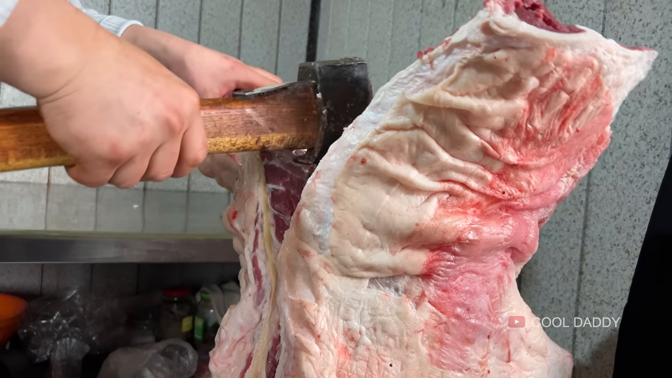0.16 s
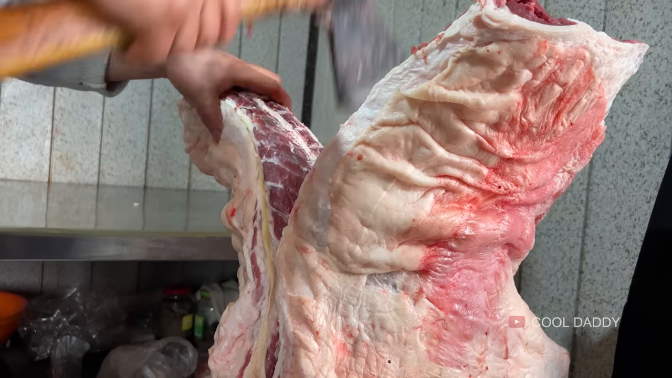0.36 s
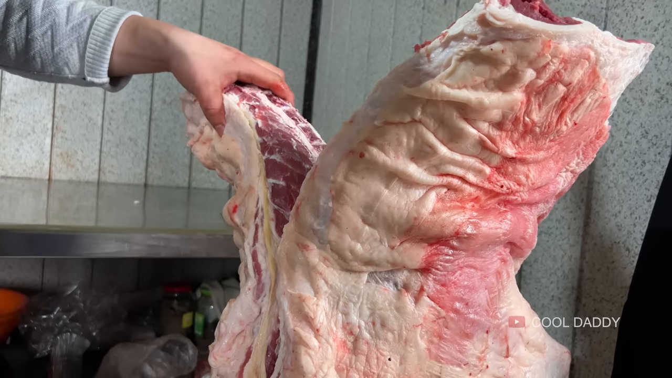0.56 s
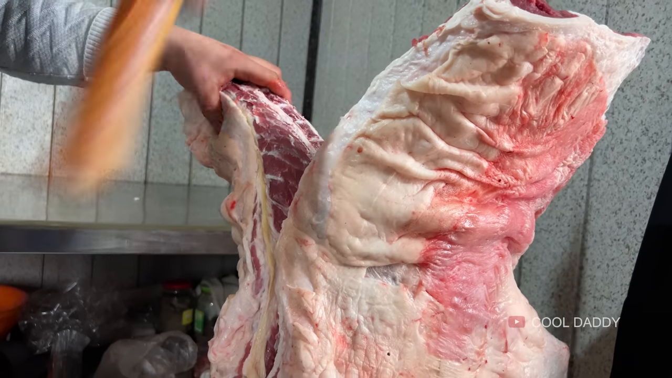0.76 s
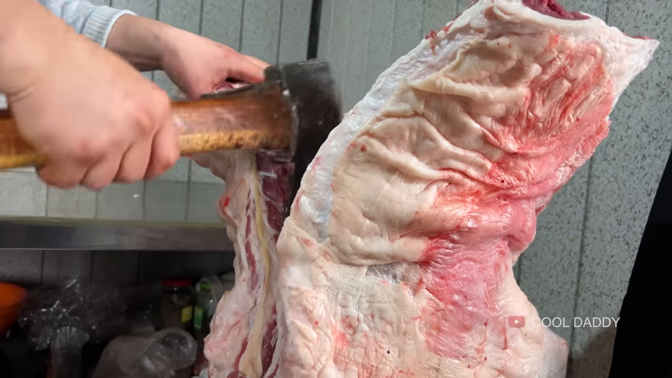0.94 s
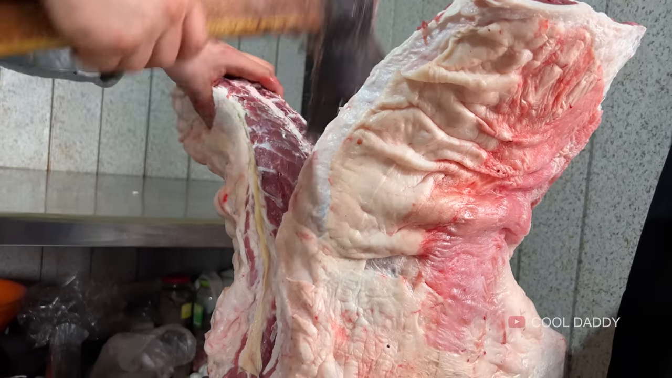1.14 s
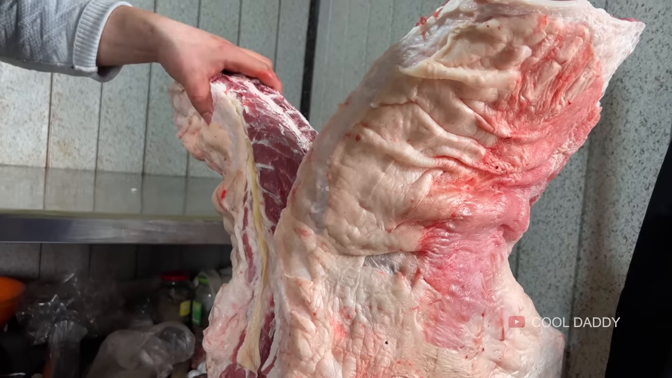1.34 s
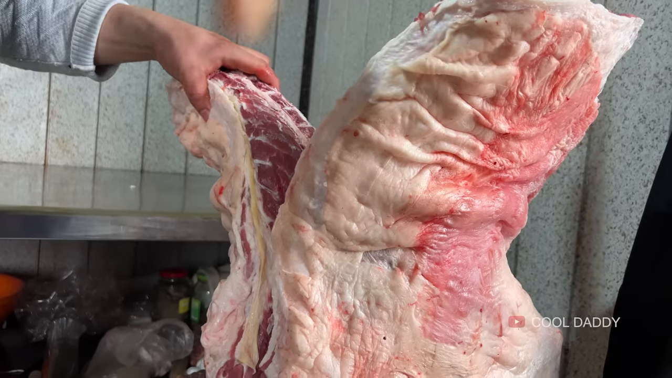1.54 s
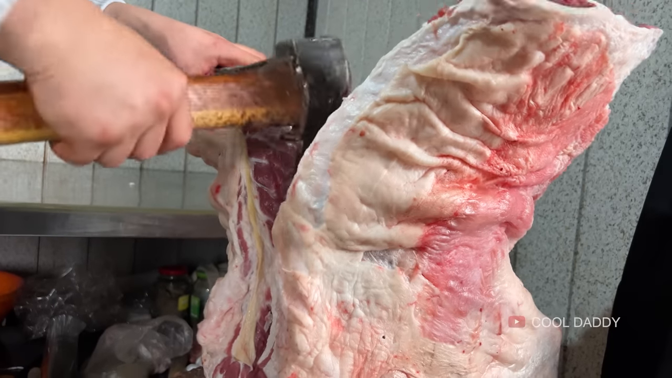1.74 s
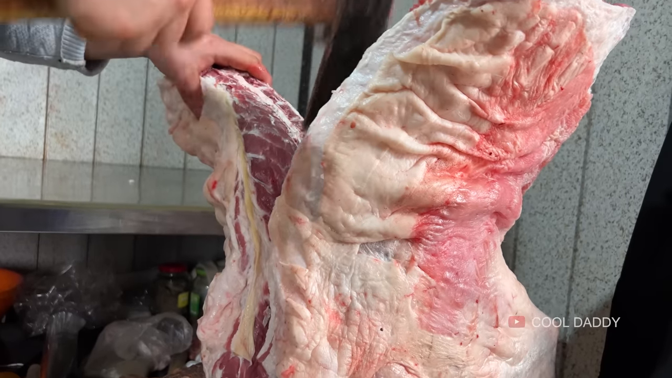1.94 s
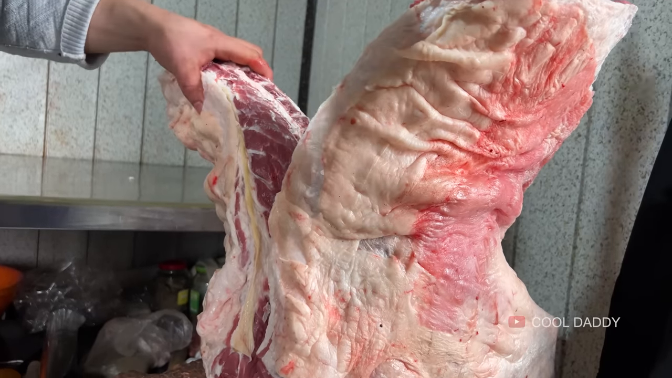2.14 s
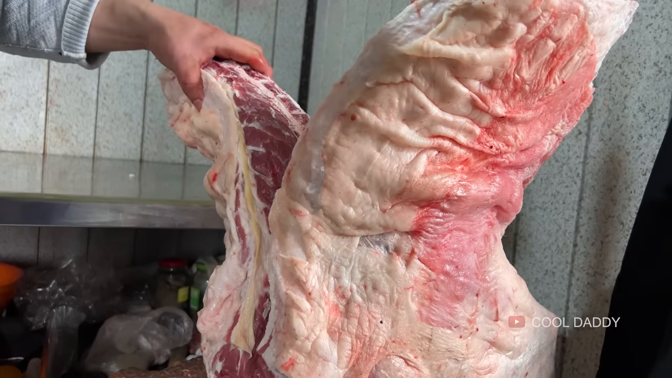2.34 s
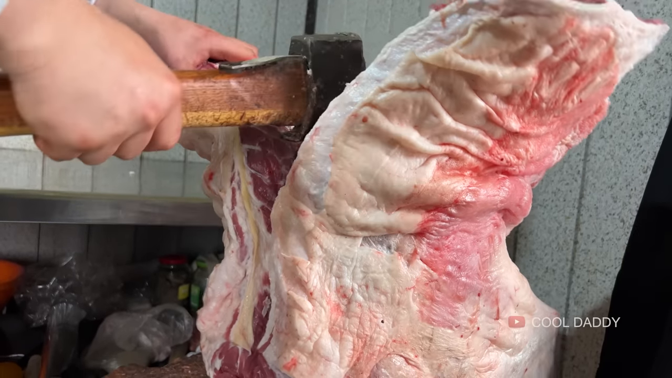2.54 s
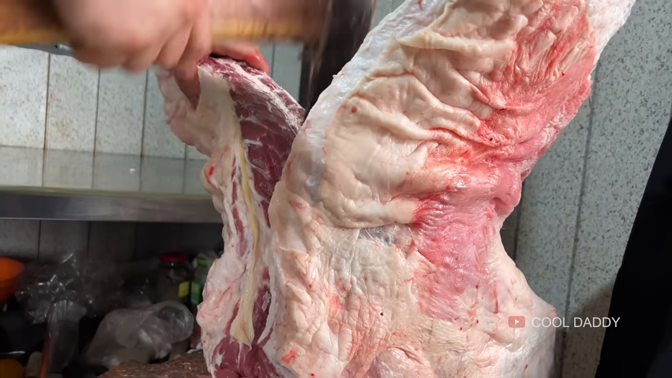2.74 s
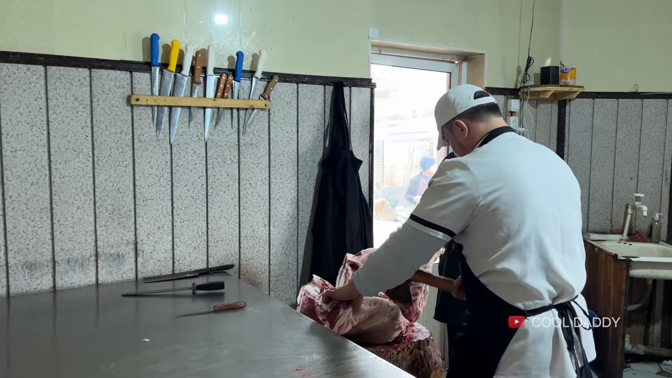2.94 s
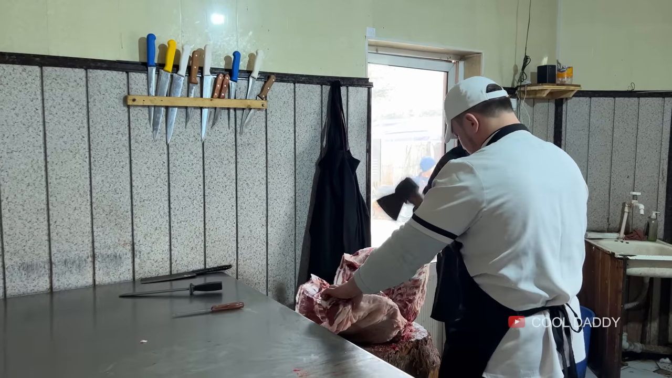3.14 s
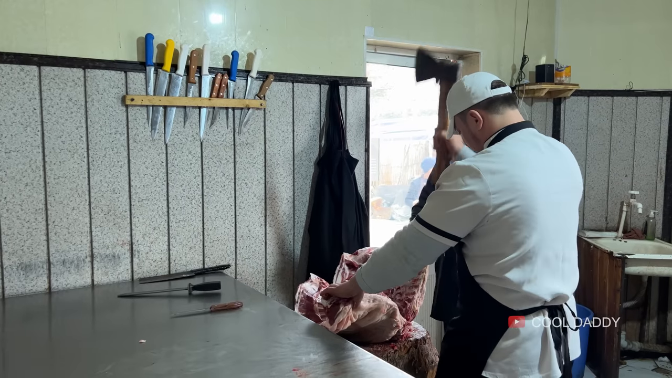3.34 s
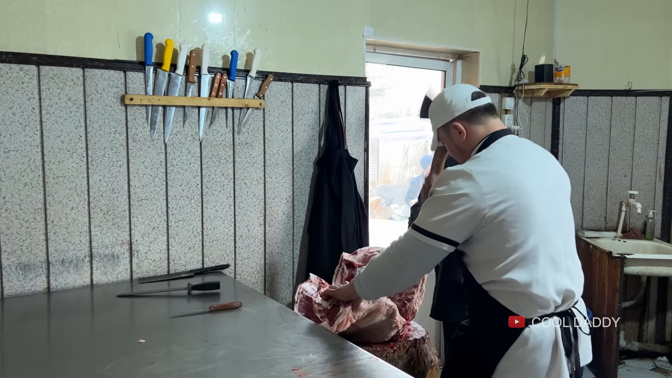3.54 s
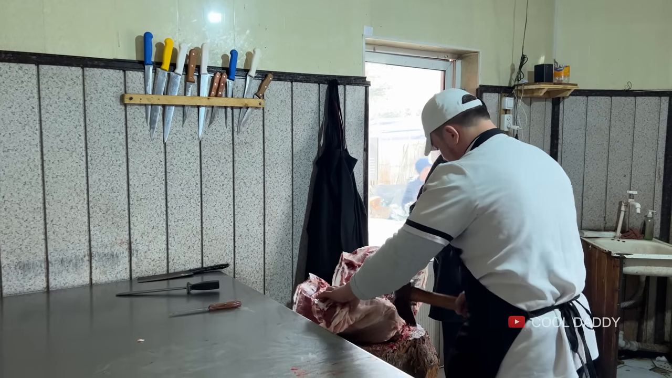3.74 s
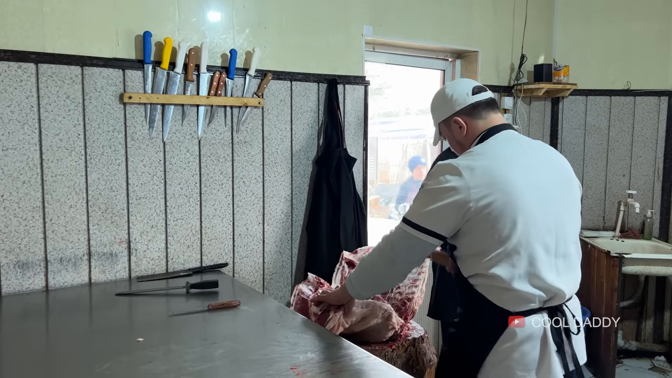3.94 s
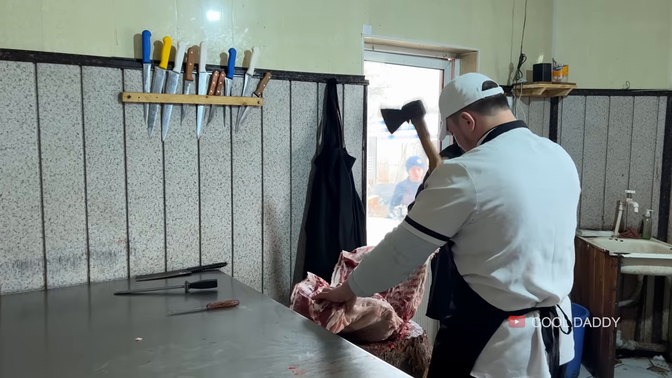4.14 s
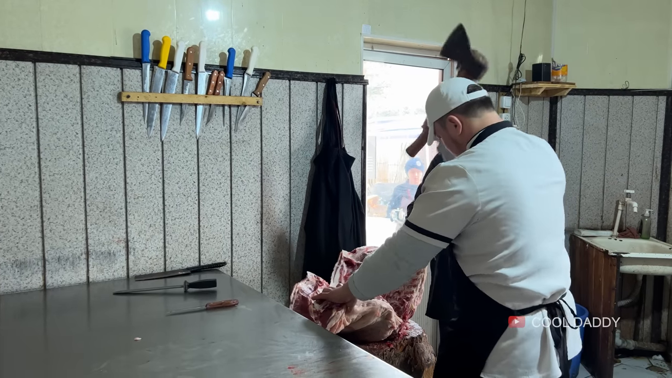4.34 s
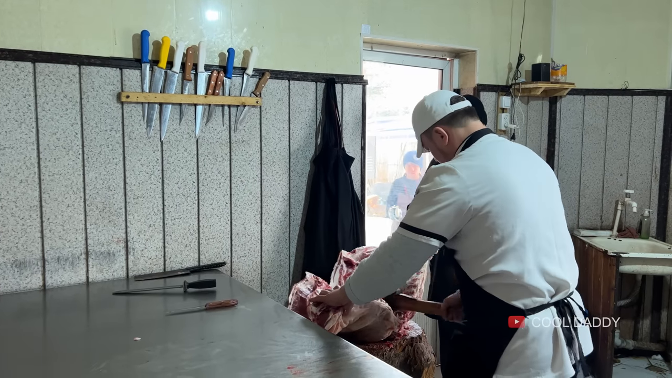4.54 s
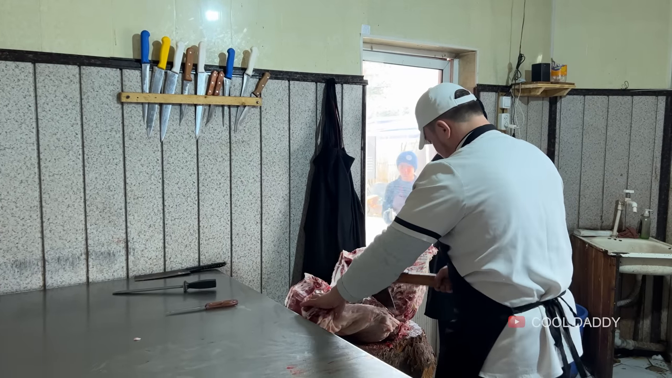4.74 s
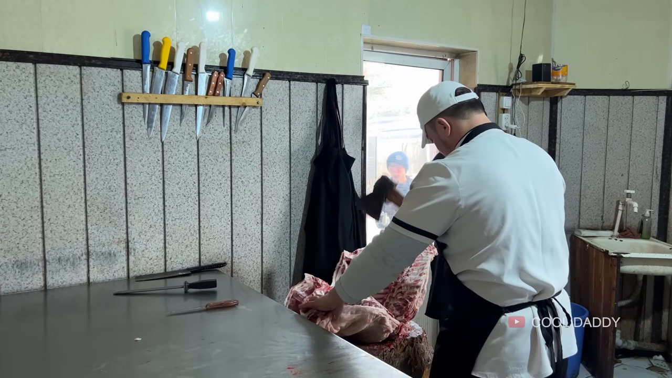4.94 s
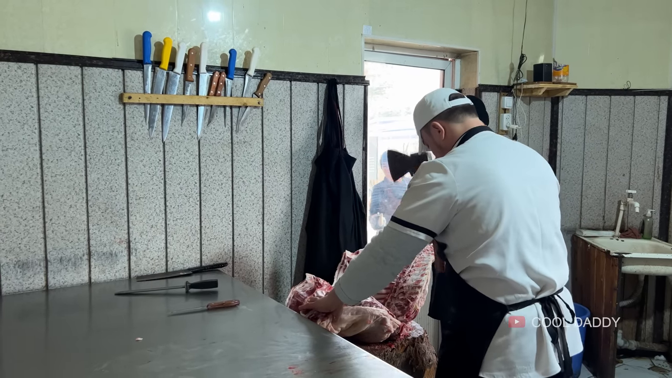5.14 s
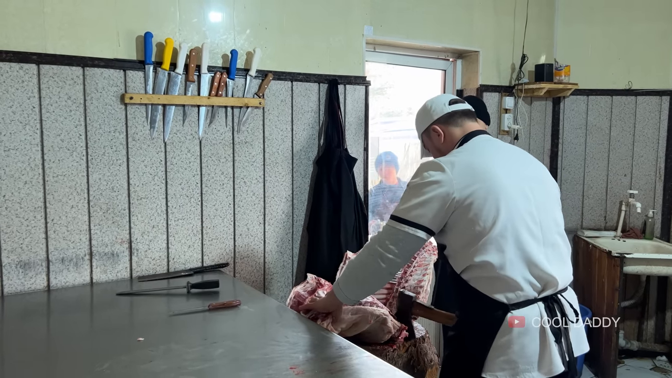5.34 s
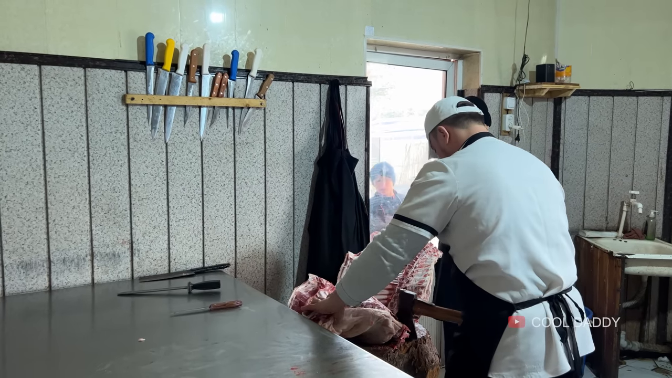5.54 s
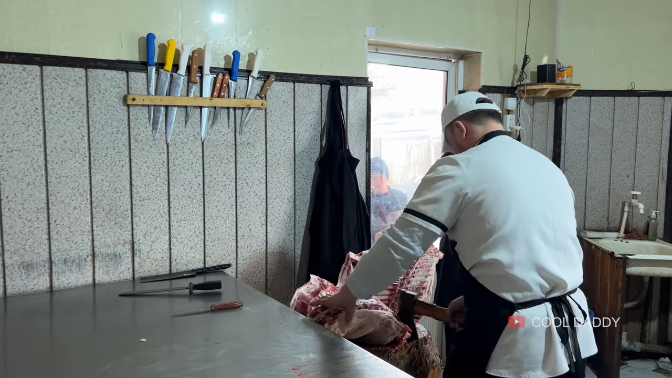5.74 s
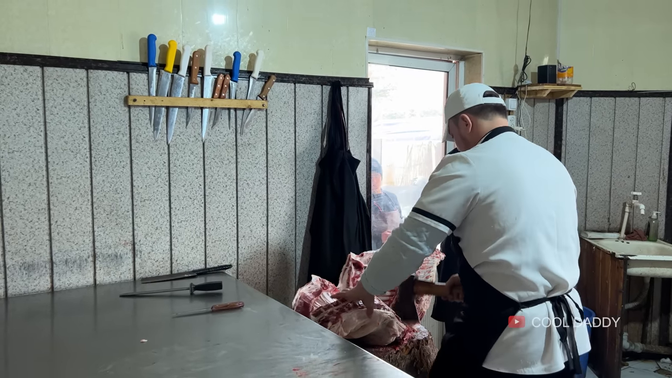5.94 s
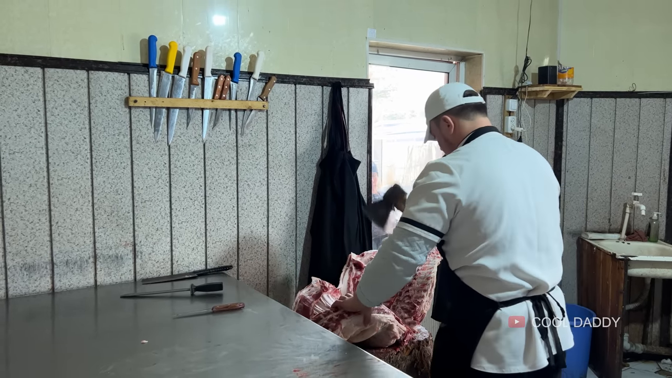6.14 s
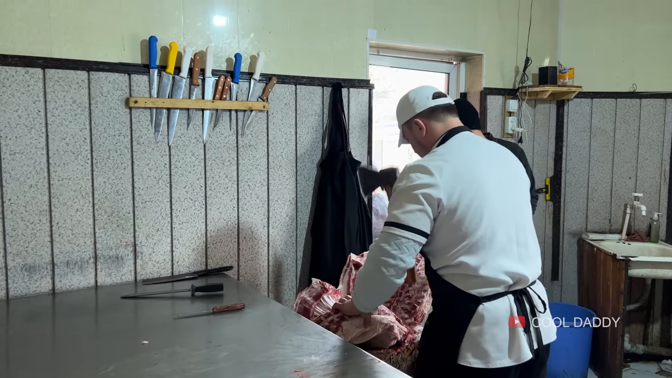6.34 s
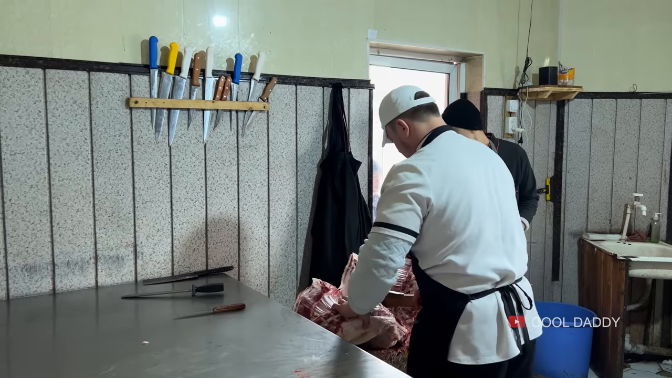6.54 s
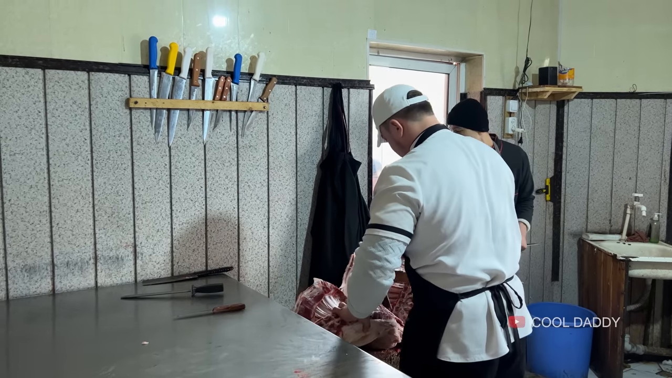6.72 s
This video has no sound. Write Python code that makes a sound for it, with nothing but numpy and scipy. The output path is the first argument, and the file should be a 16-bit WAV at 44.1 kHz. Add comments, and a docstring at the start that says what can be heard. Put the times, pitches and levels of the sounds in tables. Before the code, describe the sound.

Sharp bony whacks with splintering cracks and dull wooden thuds, close and dry at first, then more echoing, with a faint hinge squeak.

```python
"""A heavy axe splits a carcass on a wooden block in a tiled room, heard first from close by, then from across the room.
In most blows the edge knocks on bone (short ringing tones) and crushes into it, the bone splinters (bursts of tiny
cracks), and a moment later meat and block thud (filtered grains and ringing wood). At 0 and 2.87 s only the end of
a blow is heard, tearing bone and thud. In between come fine crackles, thin hisses and a faint hinge squeak (a
wavering tone and noise). A cooler hums in dull room air (filtered noise); wall echoes and a tail make the room."""
import sys
import numpy as np
from scipy import signal
from scipy.fft import rfft, irfft, next_fast_len
from scipy.io import wavfile
from scipy.ndimage import uniform_filter1d, minimum_filter1d

SR = 44100
rng = np.random.default_rng(int(sys.argv[2]) if len(sys.argv) > 2 else 0)


def generate_wav(sig):
    """Save sig (samples, or channels by samples) to the path in sys.argv[1] as 16-bit PCM at SR."""
    pcm = np.round(np.clip(np.atleast_2d(sig).T, -1, 1) * 32767).astype(np.int16)
    wavfile.write(sys.argv[1], SR, pcm)


N = 298998  # length of the whole sound in samples
EVENT_SIZE = 2 ** 14  # length of one short sound in samples
TIME = np.arange(N) / SR

# The edge meets bone. Each row: start in seconds, level in dB, ring pitch in Hz,
# time for the ring to fall by 60 dB in seconds.
EDGE_HITS = [(.8078, -17, 1650, .014), (1.6413, -27, 2600, .01), (2.4456, -15, 2150, .012),
             (3.6432, -18, 1500, .008), (4.5132, -16, 1700, .008), (5.3068, -20, 1500, .008),
             (6.479, -36, 1100, .012)]
# Tone colour of breaking bone. Each row: frequency in Hz, level in dB per Hz.
BONE_COLOUR = [(60, -40.5), (200, -15.5), (400, -4), (700, -8.5), (1100, -1), (1800, 0.5), (3000, -3),
               (5000, -7.5), (8000, -17), (12000, -22), (16000, -28.5)]


def from_db(db):
    """Turns decibels into a plain amplitude factor."""
    return np.exp(np.asarray(db) * (np.log(10) / 20))


def rms_one(x):
    """Scales a sound to an rms (average strength) of 1."""
    return x / np.sqrt(np.mean(x ** 2) + 1e-20)


def unit_blow(x):
    """Scales a sound to the energy of 10 ms at rms 1, so that short and long blows compare."""
    return x * np.sqrt(.01 * SR / (np.sum(x ** 2) + 1e-20))


def at_hz(points, hz):
    """Reads a table between its rows, on a logarithmic frequency axis."""
    known_hz, values = np.transpose(points)
    return np.interp(np.log(np.maximum(hz, 1)), np.log(known_hz), values)


def bins(size):
    """Frequencies in Hz of the spectrum of a sound with this many samples."""
    return np.arange(size // 2 + 1) * SR / size


def bell(hz, centre_hz, width_hz):
    """Shape of a resonance: 1 on top, one half at half the width to either side."""
    return 1 / (1 + (2 * (hz - centre_hz) / width_hz) ** 2)


def coloured(x, curve_db):
    """Filters with a given gain at each frequency; minimum phase, so nothing sounds ahead of its cause."""
    cepstrum = irfft(np.log(from_db(curve_db)))
    half = len(cepstrum) // 2
    # folding the cepstrum onto positive times gives the minimum phase
    folded = np.r_[cepstrum[0], 2 * cepstrum[1:half], np.zeros(half)]
    return irfft(rfft(x) * np.exp(rfft(folded)))


def steady_noise(gain):
    """Noise of rms 1, shaped by a function that gives the gain at each frequency."""
    size = next_fast_len(N, real=True)
    spectrum = rfft(rng.standard_normal(size)) * gain(bins(size))
    return rms_one(irfft(spectrum, size)[:N])


def add(track, s, sound):
    """Mixes a sound into a track, starting at s seconds."""
    start = max(round(s * SR), 0)
    track[start:start + len(sound)] += sound[:N - start]


def ring(hz, t60, size=EVENT_SIZE):
    """One struck tone that falls by 60 dB in t60 seconds."""
    t = TIME[:size]
    return np.sin(2 * np.pi * hz * t) * from_db(-60 * t / t60)


def grains(length_s, per_s, spread_db):
    """A run of tiny ruptures of uneven size that starts at once and dies away around its length."""
    t = TIME[:EVENT_SIZE]
    born = rng.random(EVENT_SIZE) < per_s / SR
    signs = rng.choice([-1, 1], EVENT_SIZE)
    extra_db = spread_db * np.minimum(rng.exponential(1, EVENT_SIZE), 3)
    return born * signs * from_db(extra_db) * np.exp(-(t / length_s) ** 4)


def knocks(second_ratio=1.4, second_db=-3.0):
    """The edge sets the bone ringing in two tones for a few cycles, smothered by the meat round it."""
    out = np.zeros(N)
    for s, level_db, hz, t60 in EDGE_HITS:
        first_tone = ring(hz, t60)
        second_tone = from_db(second_db) * ring(hz * second_ratio, t60)
        add(out, s, from_db(level_db) * unit_blow(first_tone - second_tone))
    return out


def bites(bite_db=-10.0, bite_s=0.0058):
    """The edge crushes its way into the bone as it lands: a short burst of grains with each knock."""
    out = np.zeros(N)
    bone_db = at_hz(BONE_COLOUR, bins(EVENT_SIZE))
    for s, level_db, _, _ in EDGE_HITS:
        crush = coloured(grains(bite_s, per_s=4000, spread_db=1.5), bone_db)
        add(out, s, from_db(level_db + bite_db) * unit_blow(crush))
    return out


def cracks():
    """Bone gives way in a burst of micro-fractures that ring in the axe head and in the piece being split."""
    # Bone splinters or tears. Each row: start in seconds, level in dB, length in seconds,
    # tilt in dB per octave, ring pitch in Hz, ring boost in dB.
    breaks = [(.000, -23, .053, 4.2, 1868, 14), (.057, -29.5, .25, .5, 1935, 9),
              (.79, -43.5, .015, 0, 4000, 0), (.8091, -15, .0069, 0, 850, 7),
              (1.6446, -15.5, .004, .3, 2610, 0), (2.4505, -14, .0056, 1.2, 3100, 6),
              (2.8715, -28, .022, -1, 2600, 5), (2.878, -31.5, .14, -.3, 2000, 2),
              (3.051, -46.5, .22, -3.2, 2700, 7), (3.642, -12.5, .009, -.3, 1780, 2),
              (3.673, -20, .0057, 1, 511, 10), (4.5124, -12, .0064, -.5, 2450, 2),
              (4.535, -17, .024, 0, 600, 6.5), (5.3075, -16.5, .0108, -1.5, 2765, 14.5),
              (6.480, -28.7, .017, 6.3, 5200, 0)]
    # Resonances of axe head and bone. Each row: frequency in Hz, width in Hz, boost in dB.
    axe_modes = [(913.5, 140, 4), (1196, 90, 4), (1527, 110, 2.5), (2925, 200, 1.5), (4144, 240, 1.5),
                 (7370, 170, 3), (8580, 370, 4.5)]
    # A quick snap is bright, a slow tear deep in the meat is muffled:
    # the treble limit at one length, and the power by which it falls with length.
    snap_s, snap_muffle_hz, muffle_fall = .005, 18500, .32
    # The more freely a piece rings, the narrower its resonance: width at 0 dB of ring, octaves narrower per dB.
    smothered_width_hz, narrowing_per_db = 800, .125

    out, hz = np.zeros(N), bins(EVENT_SIZE)
    axe_db = sum(db * bell(hz, centre, width) for centre, width, db in axe_modes)
    body_db = at_hz(BONE_COLOUR, hz) + axe_db
    octaves = np.log2(np.maximum(hz, 200) / 2000)  # distance from 2 kHz, for the tilt
    for s, level_db, length_s, tilt_db, ring_hz, ring_db in breaks:
        muffle_hz = snap_muffle_hz * (snap_s / length_s) ** muffle_fall
        muffle_db = -10 * np.log10(1 + (hz / muffle_hz) ** 6)
        width_hz = smothered_width_hz / 2 ** (narrowing_per_db * ring_db)
        piece_db = ring_db * bell(hz, ring_hz, width_hz)
        colour_db = body_db + muffle_db + tilt_db * octaves + piece_db
        burst = coloured(grains(length_s, per_s=9000, spread_db=5.0), colour_db)
        add(out, s, from_db(level_db) * unit_blow(burst))
    return out


def thuds(bounce_db=7.0, bounce_width=0.49):
    """The meat slaps down, bounces at its own pitch and pushes the block; a softer push reaches only the lows."""
    # Meat and block take the blow. Each row: start in seconds, block level in dB, hardness as a treble limit
    # in Hz, meat slap level in dB, slap length in seconds, bounce pitch in Hz.
    landings = [(.001, -38, 456, -24.5, 0.056, 295), (0.825, -27, 600, -24, 0.0342, 201),
                (1.656, -28, 494.3, -21.5, 0.0501, 348), (2.467, -33.5, 700, -19, .015, 209.6),
                (2.872, -45, 130, -33.5, 0.225, 142), (3.657, -18.5, 399, -16, 0.0291, 110.4),
                (4.530, -23.5, 566.4, -28.5, 0.0203, 348), (5.329, -25, 200, -18, 0.0297, 100),
                (6.485, -31, 101, -23, 0.0224, 79.3), (6.676, -42.5, 60, -41, 0.0306, 112)]
    # Tones of the chopping block on the floor. Each row: frequency in Hz, average level in dB,
    # time to fall by 60 dB in seconds.
    block_modes = [(70, -3, 0.25), (99.8, -1, 0.097), (137, -6, 0.14), (183.3, 2.5, 0.03),
                   (258.83, -7, 0.23), (324.3, 5, 0.11), (416.7, -0.5, .06), (582.2, 1.5, 0.043)]
    # Tone colour of slapping meat. Each row: frequency in Hz, level in dB per Hz.
    slap_colour = [(40, -16.5), (90, -0.5), (250, 1), (450, -7.5), (800, -0.5), (1600, -6), (5000, -21),
                   (16000, -30.5)]

    out, bin_hz = np.zeros(N), bins(EVENT_SIZE)
    for s, block_db, hardness_hz, slap_db, slap_s, bounce_hz in landings:
        block = np.zeros(EVENT_SIZE)
        for k, (hz, db, t60) in enumerate(block_modes):
            strength = from_db(db + rng.normal(0, 1)) / np.hypot(1, hz / hardness_hz)
            block += (-1) ** k * strength * ring(hz, t60)  # neighbouring tones start in opposite directions
        softness_db = -20 * np.log10(np.hypot(1, bin_hz / hardness_hz))
        bounce_curve_db = bounce_db * bell(bin_hz, bounce_hz, bounce_width * bounce_hz)
        meat_db = at_hz(slap_colour, bin_hz) + bounce_curve_db
        slap = coloured(grains(slap_s, per_s=5000, spread_db=2.5), meat_db + softness_db)
        add(out, s, from_db(block_db) * unit_blow(block) + from_db(slap_db) * unit_blow(slap))
    return out


def handling():
    """Shifted meat gives a fine crackle that swells and fades; in narrow bands it becomes a thin hiss."""
    # Crackles and thin hisses; the narrow one at 5.5 s is the chop's lingering ring or the hinge starting.
    # Each row: start in seconds, level in dB, length in seconds, centre of the band in Hz, half width in octaves.
    rustles = [(.546, -63.5, .0104, 7000, 1.77), (1.394, -56.5, .27, 3715, .32),
               (1.896, -65, .0034, 6000, 1), (2.165, -67.5, .0018, 4475, .77),
               (2.349, -58, .0094, 3000, .77), (3.17, -74, .09, 5000, .76),
               (4.924, -67.5, .068, 7000, 1.16), (5.111, -58.5, .0555, 4450, 1.96),
               (5.5, -60, .3, 2780, .2), (5.992, -54, .14, 2300, 1.45), (6.13, -63.5, .058, 4500, 1.16),
               (6.695, -62.5, .059, 6000, .89)]
    out, hz = np.zeros(N), np.maximum(bins(EVENT_SIZE), 300)
    for s, level_db, length_s, centre_hz, octaves in rustles:
        swell = np.minimum(TIME[:EVENT_SIZE] / length_s, 1)
        crackle = swell * grains(length_s, per_s=3800, spread_db=6.0)
        band_db = 20 * np.log10(bell(np.log2(hz), np.log2(centre_hz), 2 * octaves))
        add(out, s, from_db(level_db) * unit_blow(coloured(crackle, band_db)))
    return out


def swell_and_fade(start_s, attack_s, hold_s, release_s, fade_db_per_s=26):
    """Loudness of the door hinge: a quick rise, a steady fade, then a release that adds 60 dB per release_s."""
    t = np.maximum(TIME - start_s, 0)
    released_s = np.maximum(t - attack_s - hold_s, 0)
    return np.minimum(t / attack_s, 1) * from_db(-fade_db_per_s * t - 60 * released_s / release_s)


def squeak(squeal_hz=2722, waver_hz=12.0, squeal_db=-59, rasp_db=-57):
    """A dry door hinge breaks loose with rough overtones (noise bands), then slides with a thin wavering squeal."""
    # Overtones of the hinge. Each row: frequency in Hz, width in Hz, level in dB.
    hinge = [(1456, 50, -1), (2900, 200, -8), (3970, 160, -13), (5337, 120, -17), (7230, 130, -17),
             (8587, 45, -4), (11370, 90, -19)]
    pitch = squeal_hz + waver_hz * steady_noise(lambda hz: bell(hz, 0, 60))
    squeal = np.sqrt(2) * np.sin(2 * np.pi * np.cumsum(pitch) / SR)
    rasp = steady_noise(lambda hz: sum(from_db(db) * bell(hz, centre, width) for centre, width, db in hinge))
    squeal_shape = swell_and_fade(start_s=5.895, attack_s=.03, hold_s=.39, release_s=.4)
    rasp_shape = swell_and_fade(start_s=5.885, attack_s=.02, hold_s=.025, release_s=.3)
    return from_db(squeal_db) * squeal_shape * squeal + from_db(rasp_db) * rasp_shape * rasp


def background(close, hum_width_hz=24.0):
    """Dull room air, different at the two listening spots, and a cooler whose tones waver as narrow noise bands."""
    # Room air close by and farther off. Each row: frequency in Hz, level in dB per Hz.
    near_air = [(30, -26.5), (75, -5.5), (130, -15.5), (175, 0), (240, -18.5), (310, -9.5), (380, -20),
                (500, -13.5), (720, -26), (1500, -28), (3000, -38), (7000, -45.5), (16000, -56)]
    far_air = [(30, -23.5), (55, -3.5), (85, -5.5), (130, -5.5), (220, -6), (350, -14.5), (500, -14),
               (700, -20), (1200, -24.5), (2500, -30), (4000, -39), (9000, -44), (16000, -55)]
    # Tones of the cooler. Each row: frequency in Hz, level in dB.
    cooler = [(113, -3), (218, -23), (308, -21), (480, -15)]
    near_air_db, far_air_db = -63.5, -57.5
    near_hum_db, far_hum_db = -76, -59
    settle_db, settle_s = 13.5, 1.1  # close by, the air starts louder and settles

    near_level = from_db(near_air_db + settle_db * np.exp(-TIME / settle_s))
    near = near_level * steady_noise(lambda hz: from_db(at_hz(near_air, hz)))
    far = from_db(far_air_db) * steady_noise(lambda hz: from_db(at_hz(far_air, hz)))
    hum = steady_noise(lambda hz: sum(from_db(db) * bell(hz, centre, hum_width_hz) for centre, db in cooler))
    return np.where(close, near + from_db(near_hum_db) * hum, far + from_db(far_hum_db) * hum)


def echoes(x, walls):
    """The direct sound and its first returns from the walls."""
    out = x.copy()
    for delay_s, echo_db in walls:
        add(out, delay_s, from_db(echo_db) * x)
    return out


def reverberate(x, build_s=0.0092):
    """A diffuse tail of noise bands that builds up quickly, each band dying at its own rate."""
    # Decay of the tiled room. Each row: frequency in Hz, time to fall by 60 dB in seconds.
    room_t60 = [(70, 0.5954), (150, 1.2985), (300, .5), (700, 0.5239), (1500, 0.6339), (3000, 0.5407),
                (5500, 0.4429), (8000, 0.371), (11000, 0.4288), (16000, 0.0021)]
    # Tone colour of the room. Each row: frequency in Hz, level in dB.
    room_colour = [(60, -10), (300, -3), (1500, 0), (4000, 0), (8000, 2.5), (16000, -1)]
    t, hz = TIME[:SR], bins(SR)
    white, tail = rfft(rng.standard_normal(SR)), np.zeros(SR)
    edges = np.geomspace(30, 20000, 20)
    for low, high in zip(edges, edges[1:]):
        centre = np.sqrt(low * high)
        band = irfft(white * ((hz >= low) & (hz < high)), SR)
        tail += band * from_db(at_hz(room_colour, centre) - 60 * t / at_hz(room_t60, centre))
    tail *= 1 - np.exp(-(t / build_s) ** 2)
    return signal.fftconvolve(x, tail / np.sqrt(.04 * SR))[:N]


def scene(near_wet_db=-3.0, far_wet_db=2.0, near_boom_db=-6.5, far_boom_db=0.5, knock_wet_db=-13.0, count=4):
    """The chopping, close by and dry at first, then farther off with more of the room."""
    # Wall echoes close by and farther off. Each row: delay in seconds, level in dB.
    near_echoes = [(.016, -14.5), (0.027, -24), (0.038, -24)]
    far_echoes = [(.006, -12), (0.0133, -8), (.024, -7.5), (.031, -14.5), (0.045, -8.5)]
    close = TIME < 2.86  # seconds spent at the near listening spot

    knock, body = knocks(), thuds() + handling()
    work = knock + bites() + cracks() + body
    early = echoes(work * close, near_echoes) + echoes(work * ~close, far_echoes)
    # splintering bone sends a different crackle in each direction, and the walls mix them all
    wet = np.where(close, from_db(near_wet_db), from_db(far_wet_db))
    splinters = sum(reverberate(wet * cracks()) for _ in range(count)) / np.sqrt(count)
    # beside the block its thud is tight; farther off the room booms with it
    boom_share = np.where(close, from_db(near_boom_db), from_db(far_boom_db))
    boom = reverberate(boom_share * (body + from_db(knock_wet_db) * knock))
    return (early + splinters + boom + squeak() + background(close))[None]


def record(dry, ceiling=.66, cutoff_hz=16000):
    """A fast limiter holds down the peaks of the blows, then a steep filter cuts the top."""
    needed = np.minimum(1, ceiling / (np.abs(dry) + 1e-9))
    # the lowest gain among 65 neighbouring samples, smoothed
    gain = uniform_filter1d(minimum_filter1d(needed, size=65), size=65)
    low_pass = signal.ellip(10, .1, 80, cutoff_hz, fs=SR, output="sos")
    return signal.sosfilt(low_pass, dry * gain)


dry = scene()
out = record(dry)
generate_wav(out)
```